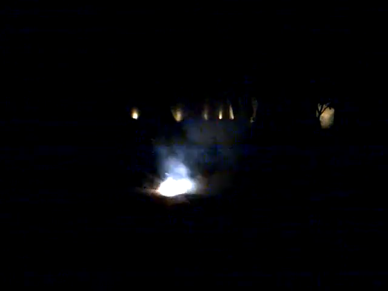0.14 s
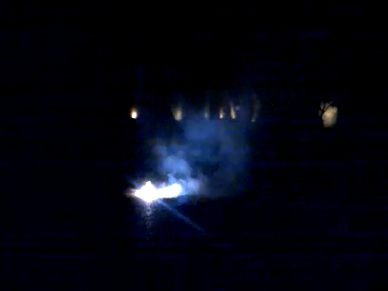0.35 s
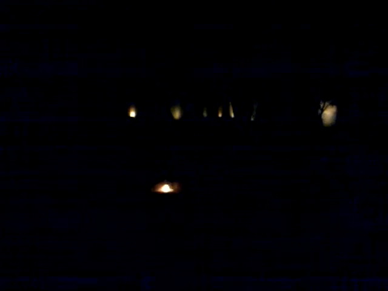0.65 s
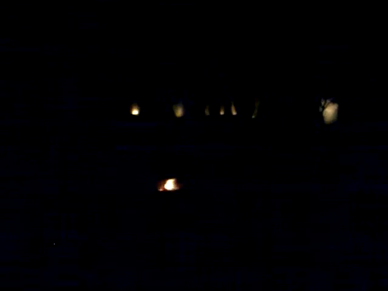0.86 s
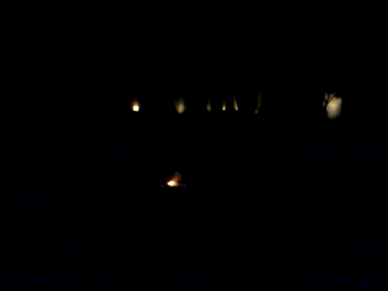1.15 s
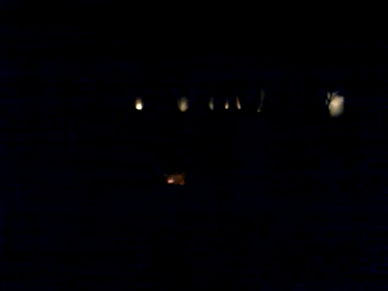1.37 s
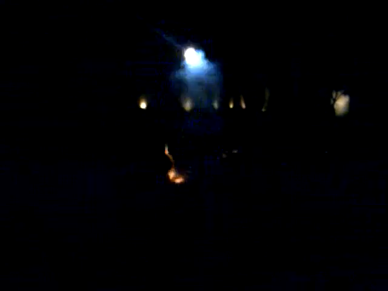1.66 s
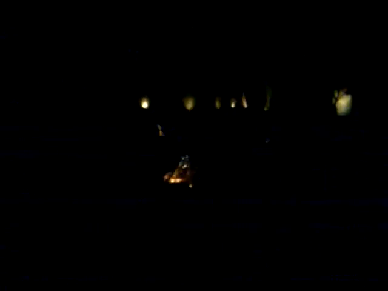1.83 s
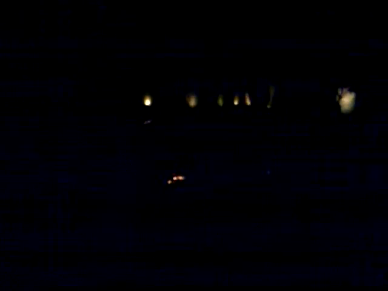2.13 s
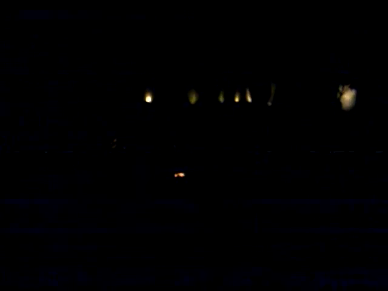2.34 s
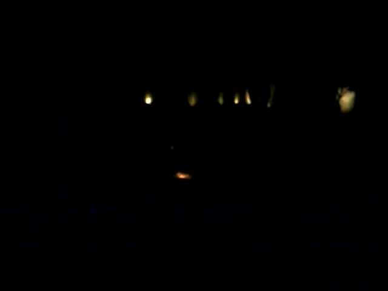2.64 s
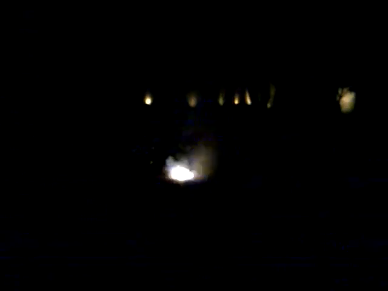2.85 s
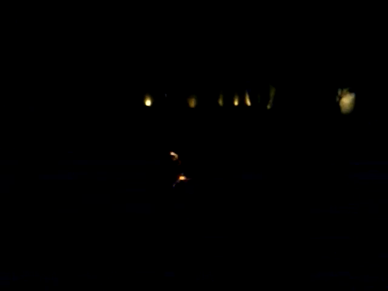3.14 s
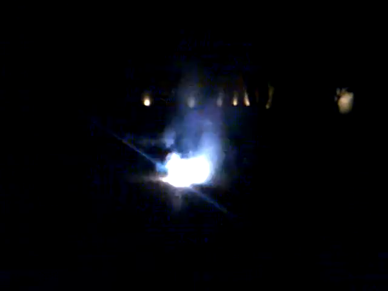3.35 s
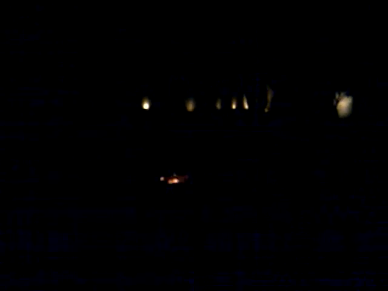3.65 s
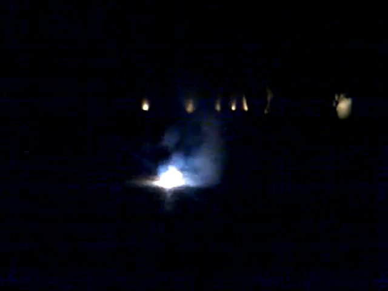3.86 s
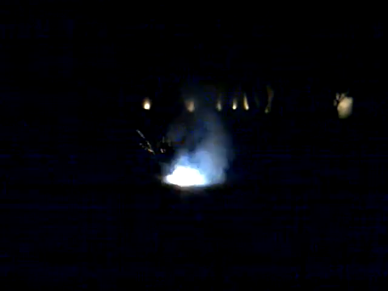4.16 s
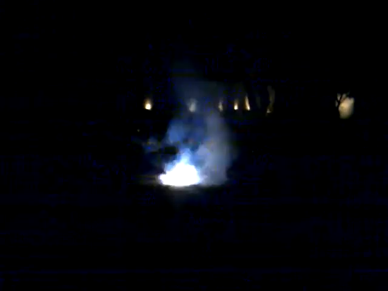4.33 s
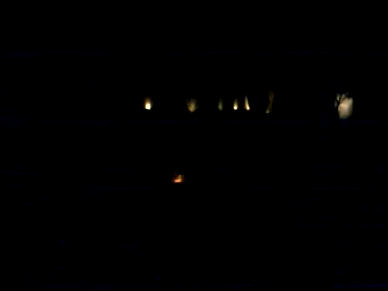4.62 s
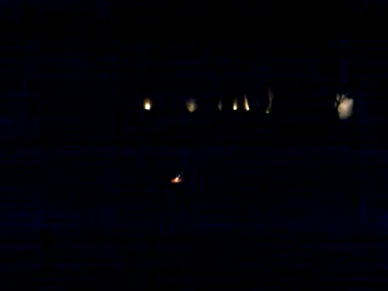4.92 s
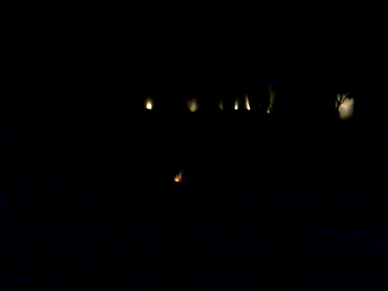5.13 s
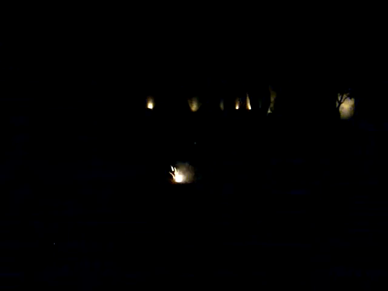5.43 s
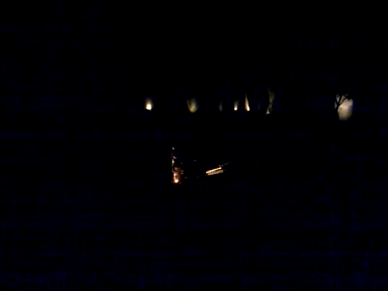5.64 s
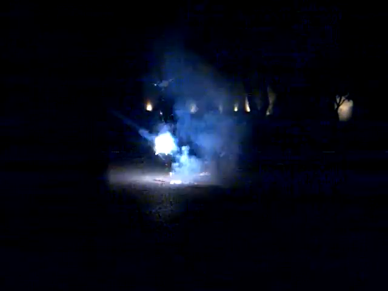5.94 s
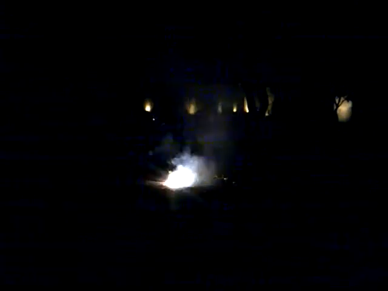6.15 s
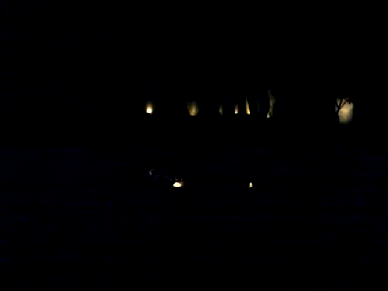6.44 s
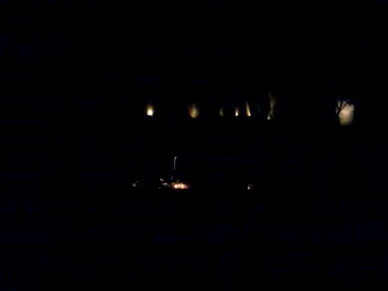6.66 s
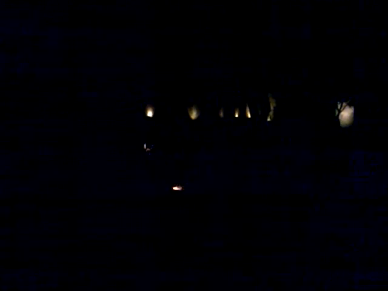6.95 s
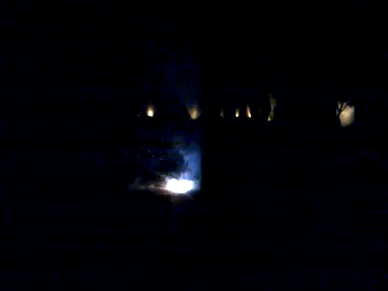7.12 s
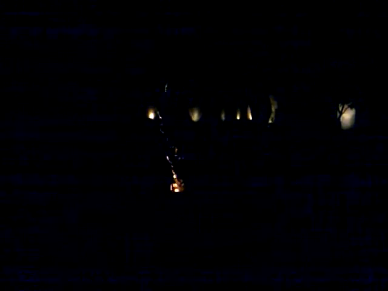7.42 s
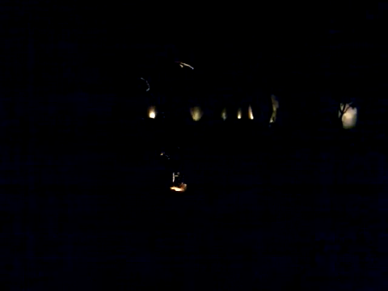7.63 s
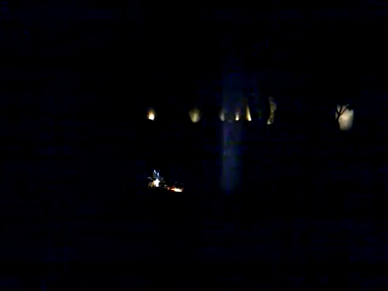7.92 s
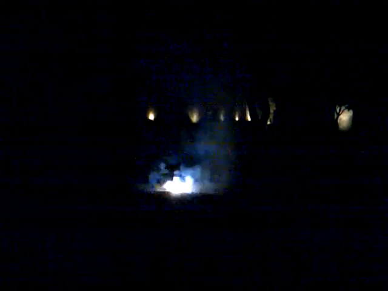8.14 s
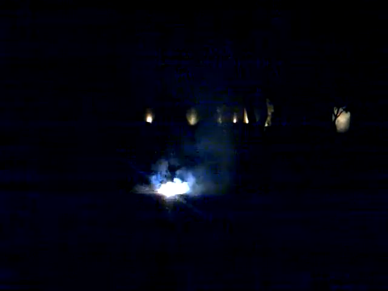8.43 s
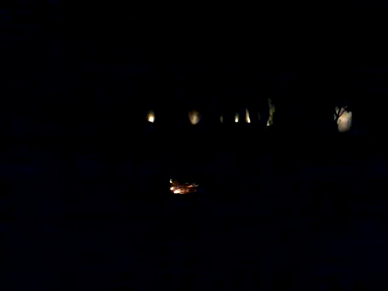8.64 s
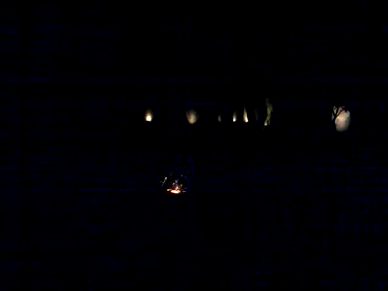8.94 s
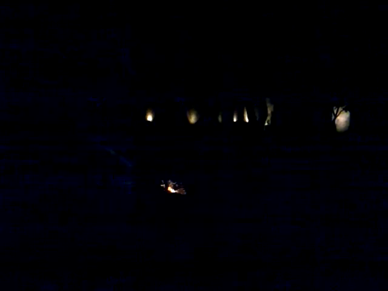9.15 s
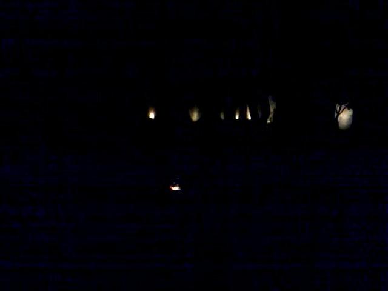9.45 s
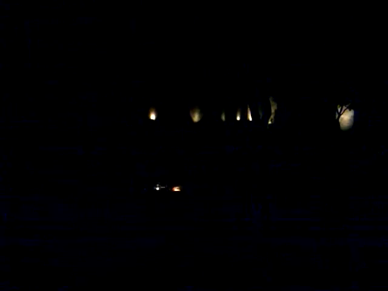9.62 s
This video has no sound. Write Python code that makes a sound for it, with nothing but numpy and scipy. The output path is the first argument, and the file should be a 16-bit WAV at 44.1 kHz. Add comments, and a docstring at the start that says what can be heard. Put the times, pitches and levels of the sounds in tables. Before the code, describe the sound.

A long string of firecrackers explodes on a street for nearly ten seconds. It opens with a patter of small crackers and a brief ringing tone between the houses. From about 0.1 seconds, sharp, close bangs follow in uneven clusters, roughly eight a second, many with a short low puff behind the crack. Quick echoes and brief pings return from the house fronts and pile up into a dense, rattling din. The bangs crowd together most around 2 seconds. A few crackers give only a dull thud, most clearly near 4.9, 6.8 and 7.8 seconds. The small microphone overloads on the bangs, squashing their peaks and ducking just after each one, and the highest treble is missing. The sound cuts out for a tenth of a second at 2.2 seconds and dips very briefly at 3.7. The bangs keep going to the end.

```python
"""A long string of firecrackers burns on a street at night, heard from a small camera.
First, small crackers patter and the street rings. A moment later the near bangs start, each a shock
and a puff of gas. They overload the microphone, whose gain control ducks after each one. The houses
answer with echoes, pings and a rattling din. From about 0.6 s on, a few crackers only thud. The sound
cuts out briefly at 2.2 s and dips at 3.7 s; the bangs go on to the end, at nearly 10 s."""
import sys
import numpy as np
from scipy import signal
from scipy.io import wavfile
from scipy.ndimage import uniform_filter1d

SR = 44100
rng = np.random.default_rng(int(sys.argv[2]) if len(sys.argv) > 2 else 0)


def to_wav(sig):
    """Store sig (one row per channel, or 1-D mono) as 16-bit WAV at the path in sys.argv[1].

    Samples outside -1..1 are clipped; the rate is SR.
    """
    pcm = np.clip(np.atleast_2d(sig), -1, 1) * 32767
    pcm = np.round(pcm).astype(np.int16)
    wavfile.write(sys.argv[1], SR, pcm.T)  # frames by channels


N = 431298

# Levels in the tables are relative: the functions add their own gains.
# the patter of small crackers under the bangs: t/s, level/dB
PATTER = [(0, -16), (.11, -20), (.17, -25.5), (.65, -29), (.8, -26), (1.7, -34.5), (2.1, -29.5), (2.5, -24),
          (3.4, -28), (4.2, -28), (4.9, -21), (5.5, -31), (6.2, -30), (7, -17), (7.6, -28), (8.1, -33.5),
          (8.6, -28), (9.78, -23.5)]
# how strongly the street rings against the rest of the din: t/s, level/dB
RING = [(0, 6.5), (.11, 4), (.17, -13.5), (4.8, -19), (4.92, -12), (5.05, -8.5), (9.78, -22)]
# the tone of the din's low, middle and high parts: f/Hz, level/dB
DIN_RUMBLE = [(25, -16), (80, -10.5), (140, -6), (220, -2), (305, 2), (420, -7), (520, -6), (700, -11.5),
              (1200, -48)]
DIN_MIDS = [(100, -26.5), (300, -9.5), (480, -11), (620, -3.5), (760, -3), (1000, 0), (1350, -3.5),
            (1600, -22), (2000, -19.5), (3000, -73.5)]
DIN_TREBLE = [(700, -16.5), (1400, 6), (1800, 1.5), (2300, -1), (2650, -8), (2900, -9.5), (3400, -11.5),
              (3950, -11), (4500, -15), (5100, -23), (5800, -21), (6500, -28), (7100, -38), (7800, -56)]
# the near bangs: t/s, blast level/dB, f/Hz that the gas puff slides down through,
# puff level/dB against the blast, level/dB of the street's answer, extra treble level/dB of that answer
BANGS = [(0.1186, 6, 344.0, -21, 2.5, -3), (0.2685, 7, 283.0, -20, 3.5, 1), (0.3, 9.5, 317.0, -9, 1.5, 0),
         (0.4471, 6, 208, -14, 5.5, -4), (0.5685, 4.0, 738, -21, -2.5, 1.5),
         (0.6928, 4.5, 670, -23, -8.5, 7.5), (0.9289, 4.5, 323.0, -3.0, -3, 2.5),
         (1.1999, 3.5, 349, -38, -4.5, 3), (1.324, 2.5, 338, -2, 0.5, -1.5),
         (1.415, 4.5, 528, -9.0, -1, -2), (1.4543, 5.5, 224, -2.5, -0.5, -3.5),
         (1.6317, 7, 319, -0.5, -1.0, 1), (1.815, 2, 177, 0.0, -1.5, -1), (1.8369, 3, 150.0, -7, -5, 6),
         (1.856, 6, 340, -1.5, -2.0, -2), (1.8944, 6.5, 562, -4, 3.5, 4), (1.9341, 7, 333, -3.0, -3.5, -1),
         (2.0191, 5, 194.0, -6, -2.5, 7), (2.0322, 8, 340.0, -6, -6.5, 2), (2.052, 4, 678.0, 6.5, 5, 1),
         (2.212, 4.5, 242, -2.5, 3.0, 5.5), (2.3112, 6, 580, -17, 3.5, 1), (2.3171, 8.5, 342, -8, -1.0, -3),
         (2.3464, 8.0, 323.0, -4, -2.5, 6), (2.5506, 5.5, 410, -8.0, -6, -4),
         (2.6233, 4, 274, -4.5, 3, -4.5), (2.8607, 4.5, 710, -7, 3, 3.5), (2.9251, 7.5, 322, -2, -1.5, -9),
         (2.9783, 8.5, 323, -3.5, 2.5, 3), (3.0454, 7.5, 494, -10.5, -9.5, -6),
         (3.1434, 6.5, 311, 0.5, 0.5, -0.0), (3.4794, 7, 684.0, -31, 4.5, -1),
         (3.6529, 6.5, 581.0, -5, 1.5, 1), (3.8685, 6.5, 225, -12.5, -4, 4.5),
         (3.9254, 6.5, 655, -5.5, -0.5, -5), (3.9967, 9, 152, -8.5, 0.5, 4), (4.2076, 6, 274, -13, 4, 3.5),
         (4.2355, 7, 264, -3, -1, -7), (4.284, 11, 146, -10.0, 4, -0.0), (4.4741, 0.5, 620, 2.5, 4, -3.5),
         (4.6407, 3.5, 572, 1, -3, -2), (4.6961, 7, 654.0, -13.0, 4.5, -1), (4.7123, 5, 795, -7, 0, 1),
         (5.0132, 7.5, 335, -5.5, -1.5, 2), (5.1329, 7.5, 328, -13.0, -6, 2), (5.1507, 8, 597, -21, 0, 2.5),
         (5.407, 5, 534, -4.5, -2.5, 4), (5.6736, 6.5, 272, -22, 1.5, -0.5), (5.847, 6, 591, -10, 0, 1),
         (5.8866, 6.0, 644, -4, -2.5, 2.5), (6.0237, 5.5, 252, -4, -0.5, 6), (6.0396, 5.5, 185, -1, -3, -6),
         (6.1354, 7, 351, -32, -0.5, -0.5), (6.2466, 5, 311.0, -6.0, 0.0, -7),
         (6.2932, 3.5, 745, 2, -1.5, 2), (6.4653, 4.5, 147, -5.5, 0, 0.5), (6.664, 4.5, 303, -15, -8, 0),
         (6.7702, 2.5, 343, -2.5, -1.5, -10), (6.8413, -1, 167.4, 1, 0, -1.5),
         (6.8833, 4.5, 562.0, -7, -4.5, -1), (7.144, 7.5, 590, -6.5, -1, 6),
         (7.2808, 5.5, 522, -3, -1.5, -16), (7.3761, 6, 287, -23, -1.0, 3), (7.693, 6, 577, -6.5, 1.5, 3.5),
         (7.9459, 5.5, 155, -30, 5.5, 0), (7.9637, 6.5, 544, -15, 0.5, -4), (8.0316, 5, 535, -3, 1, 4),
         (8.2768, 6, 335, -5.5, -2.5, 3.5), (8.5627, 7, 792, -18, 7, -5), (8.612, 9, 380, -9, 1, 4),
         (8.6892, 5.5, 163, -2, -3.5, -7), (8.7963, 2, 760.0, 4, -11, 8), (9.0251, 5, 297, -5, -0.5, -1.5),
         (9.1933, 7.5, 307, -9, 1, 0), (9.289, 5, 260, 2.5, 3.5, -2), (9.6295, 7, 467, -17.0, -2.5, 2),
         (9.718, 6.5, 365, -3.5, -5, 4.5)]
# the tone of a crack scattered off the ground and the paper: f/Hz, level/dB
SCATTER_TONE = [(60, -12.5), (300, 5.5), (700, -3.5), (1200, 6.5), (2000, -6), (3200, -8), (5000, -18),
                (7000, -27.5), (9000, -17)]
# echoes off the house fronts: delay/s, centre f/Hz, rough width/Hz, swell time/s, level/dB
HOUSE_ECHOES = [(.022, 2550, 2270, .004, -8), (0.045, 3870, 1350, .026, -16),
                (0.066, 1205, 1565, 0.0012, -2.5), (0.11, 1100, 713, 0.0025, -12),
                (0.119, 1976, 1156, 0.0024, -8.5), (.126, 284.3, 207, 0.0058, -17.5),
                (.142, 1523, 1200, .012, -14.5), (.192, 1720, 1000, .0009, -3),
                (.216, 1624, 800, .001, -2.5)]
# what a long way through the air leaves of a crack: f/Hz, level/dB
AIR_TONE = [(30, -29), (200, -2), (1200, -1), (4000, -9.5), (6000, -8.5), (7000, -10.5), (7800, -30.5)]
# crackers that burst dully: t/s, level/dB, f/Hz
THUDS = [(0.572, -13, 235), (4.906, -2.5, 200), (6.843, 2, 130), (6.947, -9, 220), (7.815, -3, 204),
         (8.097, -21, 220)]
# how well the microphone hears each pitch: f/Hz, level/dB
MICROPHONE_TONE = [(20, -14), (60, -13), (1000, -9), (5500, -3.5), (7500, -3), (9000, -6.5), (11000, -23)]
# moments when the sound cuts out or dips: start t/s, end t/s, level/dB
DROPOUTS = [(2.214, 2.222, -24), (2.222, 2.311, -58), (3.657, 3.676, -11)]

RING_HZ = 1180  # pitch of the street's ring and of the pings


def gain_of(db):
    """Turns decibels into a factor to multiply a sound by."""
    return 10 ** (np.asarray(db) / 20)


def evened(x):
    """Scales a sound to an average power of 1."""
    return x / np.sqrt(np.mean(x ** 2) + 1e-20)


def curve(rows):
    """Joins the points of a time table with straight lines, one value a sample."""
    times, values = np.transpose(rows)
    return np.interp(np.arange(N) / SR, times, values)


def add(mix, start_s, sound):
    """Adds a sound to the mix at the given time."""
    part = mix[max(round(start_s * SR), 0):][:len(sound)]
    part += sound[:len(part)]


def colour(x, tone, size=2048):
    """Gives a sound the tone in a table; the filter never sounds early, so clicks keep a sharp front."""
    hz, db = np.transpose(tone)
    bin_hz = abs(np.fft.fftfreq(size, 1 / SR))
    log_gain = np.log(gain_of(np.interp(np.log(bin_hz + 1), np.log(hz), db)))
    taps = np.fft.ifft(np.exp(np.conj(signal.hilbert(log_gain)))).real
    return signal.fftconvolve(x, taps)[:len(x)]


def resonate(x, hz, width_hz):
    """Brings out one pitch by passing the sound twice through the same resonance."""
    r = np.exp(-np.pi * width_hz / SR)
    for _ in range(2):
        x = signal.lfilter([1, 0, -1], [1, -2 * r * np.cos(2 * np.pi * hz / SR), r * r], x)
    return x


def din_levels(street_db=-14, sag_db_per_s=14.5, hold_s=0.13, fall_db_per_s=90.5, bloom_s=0.23):
    """How loud the din and its treble are: the street's answers to the bangs pile up on the patter."""
    age = np.arange(SR) / SR
    sag_db = sag_db_per_s * age  # an answer sags slowly while the house fronts return it
    fall_db = fall_db_per_s * np.maximum(age - hold_s, 0)  # then it dies away
    answer = gain_of(street_db - sag_db - fall_db) ** 2
    bloom = gain_of(3 * (np.minimum(age / bloom_s, 1) - .5)) ** 2  # late returns are the brightest
    power = gain_of(curve(PATTER)) ** 2
    treble_power = power * gain_of(1) ** 2
    for s, *_, answer_db, bright_db in BANGS:
        add(power, s, gain_of(answer_db) ** 2 * answer)
        add(treble_power, s, gain_of(answer_db + bright_db) ** 2 * answer * bloom)
    return np.sqrt(power), np.sqrt(treble_power)


def rattle(pops_per_s=150, spread_db=2.0, scatter_s=0.0054, far_echoes=.7):
    """The power of small, uneven pops, each smeared for a moment by the street; about 1 on average."""
    sizes = gain_of(spread_db * np.minimum(rng.exponential(1, N), 3))
    pops = sizes * (rng.random(N) < pops_per_s / SR)
    power = signal.lfilter([1], [1, -np.exp(-2 / (scatter_s * SR))], pops ** 2)
    power = uniform_filter1d(power / power.mean(), size=130) + far_echoes  # scattering rounds each front
    return power / uniform_filter1d(power, size=4000)  # the fuse feeds crackers at an even pace


def street_din(rumble_db=-7.5, mids_db=3, ring_db=5, shared=0.61):
    """The street gives the rattle a rumble, a strong middle, a brittle top and a ring between houses."""
    level, treble_level = din_levels()
    common = rattle()  # some pops are broad, others only deep, dull or bright
    deep, dull, bright = (np.sqrt(shared * common + (1 - shared) * rattle()) * rng.standard_normal(N)
                          for _ in range(3))
    lull = (level / level.mean()) ** .01  # the rumble sinks a touch further in quiet moments
    rumble = gain_of(rumble_db) * lull * evened(colour(deep, DIN_RUMBLE))
    mids = gain_of(mids_db) * evened(colour(dull, DIN_MIDS))
    treble = evened(colour(bright, DIN_TREBLE))
    ring = evened(resonate(rng.standard_normal(N), RING_HZ, width_hz=120))
    ring *= gain_of(curve(RING) + ring_db)
    return level * (rumble + mids + ring) + treble_level * treble


def bangs(shock_s=0.00029, scatter_s=0.0028, scatter_db=1, puff_s=0.0027, puff_boost_db=4):
    """Each bang: a shock front, some 4 ms of scatter off the ground and the paper, and a puff of gas."""
    out, t = np.zeros(N), np.arange(SR // 25) / SR
    cut_off = np.exp(-(t / .0042) ** 6)
    for s, db, hz, puff_db, *_ in BANGS:
        shock_age = t / (shock_s * rng.uniform(.6, 1.4))
        shock = -2 * (1 - shock_age) * np.exp(-shock_age)  # the air pushes, then sucks back
        noise = evened(colour(rng.standard_normal(len(t)), SCATTER_TONE))
        scatter = noise * np.exp(-t / scatter_s) * cut_off * (1 - np.exp(-shock_age))
        turns = hz * 2 * puff_s * np.log(1 + 0.81 * t / puff_s)  # the gas swings slower as it spreads
        puff = -np.sin(2 * np.pi * turns) * np.exp(-(t / puff_s) ** 2 - turns / 2)  # each swing is weaker
        bang = shock + gain_of(scatter_db) * scatter + gain_of(puff_db + puff_boost_db) * puff
        add(out, s, gain_of(db) * bang)
    return out


def swell(t, peak_s):
    """A shape that rises to 1 at the given time, then fades."""
    return t / peak_s * np.exp(1 - t / peak_s)


def house_echoes(echo_db=-1, uneven_db=1.94, jump_s=.001, follow=.7):
    """Each rough house front returns a bang as a short swell of noise with its own pitch."""
    out, t = np.zeros(N), np.arange(SR // 14) / SR
    for delay_s, hz, width_hz, swell_s, front_db in HOUSE_ECHOES:
        shape = swell(t, swell_s)
        bursts = resonate(rng.standard_normal((len(BANGS), len(t))) * shape, hz, 1.076 * width_hz)
        bursts *= np.sqrt(np.sum(shape ** 2) / np.sum(bursts ** 2, axis=1, keepdims=True))  # equal energy
        for (s, *_, answer_db, _), burst in zip(BANGS, bursts):
            path, luck = rng.standard_normal(2)  # the string jumps about, so path and strength vary
            db = follow * answer_db + front_db + echo_db + uneven_db * luck
            add(out, s + delay_s + jump_s * path, gain_of(db) * burst)
    return out


def ribbed_echo(delay_s=.0675, ping_db=-2.5, again_s=.014, again_db=-6, pitch_spread=0.041, follow=.5):
    """Evenly spaced ribs, such as a fence or steps, turn each bang into a brief double ping."""
    out, t = np.zeros(N), np.arange(SR // 20) / SR
    for s, *_, answer_db, _ in BANGS:
        detune, luck_db, slip = rng.standard_normal(3)
        hz = RING_HZ * (1 + pitch_spread * detune)
        ping = np.sin(2 * np.pi * hz * t) * swell(t, peak_s=0.0027)
        ping *= gain_of(follow * answer_db + ping_db + luck_db)
        add(out, s + delay_s, ping)
        add(out, s + delay_s + again_s + slip / RING_HZ, gain_of(again_db) * ping)
    return out


def thuds():
    """Crackers that split without a crack push out a few slow swings of air."""
    out, t = np.zeros(N), np.arange(SR // 12) / SR
    for s, db, hz in THUDS:
        add(out, s, gain_of(db) * swell(t, peak_s=0.0023) * np.sin(2 * np.pi * hz * t))
    return out


def scene():
    """Near bangs arrive sharp; the air takes the top off the echoes from the houses."""
    return (bangs() + colour(house_echoes(), AIR_TONE) + ribbed_echo() + street_din() + thuds())[None]


def excess_db(x, threshold_db, listen_s):
    """How far the sound's recent power lies above a threshold; 0 when it is below."""
    keep = np.exp(-1 / (listen_s * SR))
    power = signal.lfilter([1 - keep], [1, -keep], x ** 2)
    return np.maximum(10 * np.log10(power + 1e-12) - threshold_db, 0)


def fast_gain_control(x, recover_db_per_s=65, lag_s=.0035):
    """Turns the sound down just after a blast, too late for its front, then lets it creep back."""
    t = np.arange(N) / SR
    recovery_db = recover_db_per_s * t
    over_db = excess_db(x, threshold_db=-8, listen_s=0.00017)
    duck_db = np.maximum.accumulate(over_db + recovery_db) - recovery_db
    return x / gain_of(np.interp(t - lag_s, t, uniform_filter1d(duck_db, size=40)))


def slow_gain_control(x, strength=.3, lag_s=.005):
    """Holds the din down wherever it stays loud."""
    t = np.arange(N) / SR
    duck_db = strength * excess_db(x, threshold_db=-20, listen_s=0.085)
    return x / gain_of(np.interp(t - lag_s, t, duck_db))


def dropouts(x):
    """The sound briefly cuts out or dips."""
    level_db = np.zeros(N)
    for start_s, end_s, db in DROPOUTS:
        level_db[round(start_s * SR):round(end_s * SR)] = db
    return x * gain_of(uniform_filter1d(level_db, size=16))


def low_pass(x, hz):
    """Steeply cuts away everything above the given pitch."""
    return signal.oaconvolve(x, signal.firwin(511, hz, window=("kaiser", 9), fs=SR), "same")


def record(dry, overload=.66, ceiling=.68, low_cut_hz=35, roll_off_hz=7400):
    """The camera's microphone ducks, overloads, drops out and loses the highest treble."""
    x = colour(dry[0], MICROPHONE_TONE)
    x = slow_gain_control(fast_gain_control(x))
    x = x / (1 + (x / overload) ** 4) ** .25  # overload squashes the loud peaks
    x = signal.sosfilt(signal.butter(1, low_cut_hz, "high", fs=SR, output="sos"), x)
    x = dropouts(x)
    x = signal.sosfiltfilt(signal.butter(8, roll_off_hz, fs=SR, output="sos"), x)
    x = np.clip(low_pass(x, hz=8900), -ceiling, ceiling)  # the highest peaks are cut flat
    return low_pass(x, hz=16200)[None]


dry = scene()
out = record(dry)
to_wav(out)
```